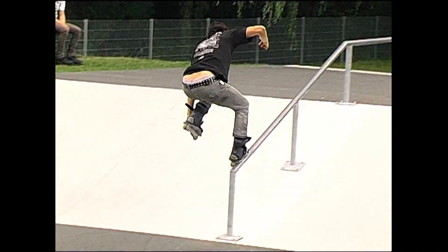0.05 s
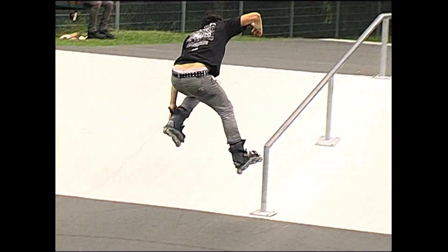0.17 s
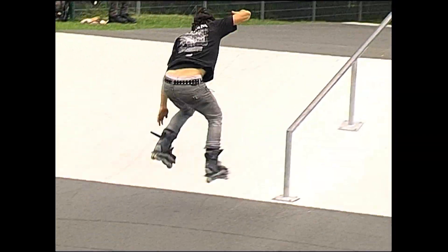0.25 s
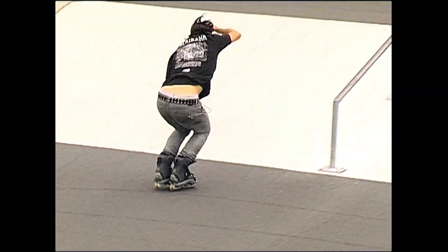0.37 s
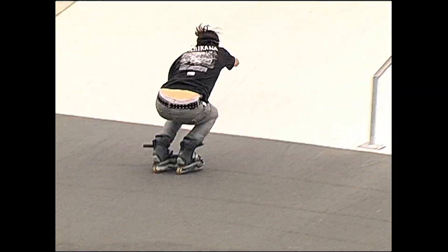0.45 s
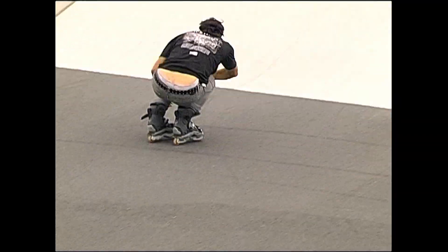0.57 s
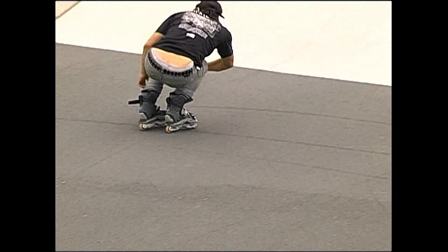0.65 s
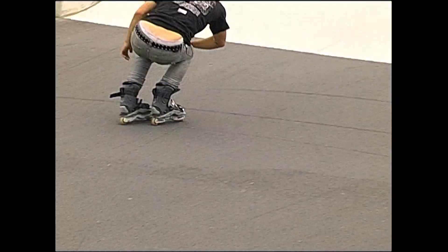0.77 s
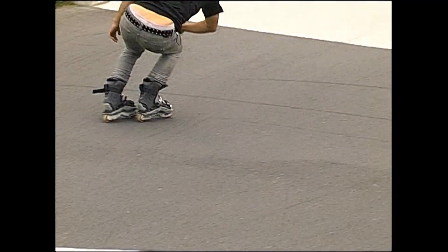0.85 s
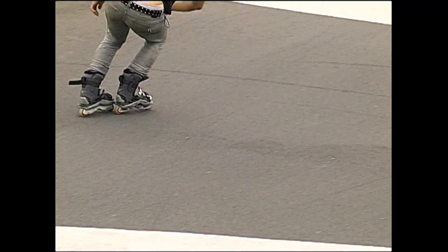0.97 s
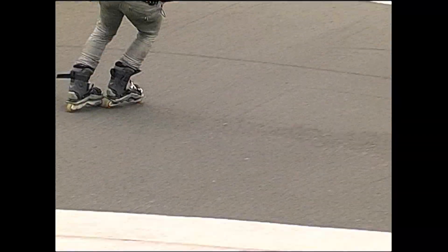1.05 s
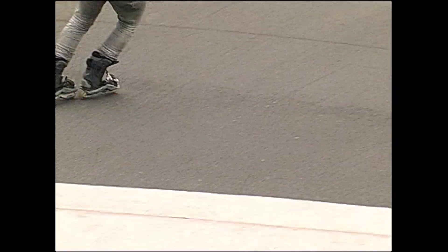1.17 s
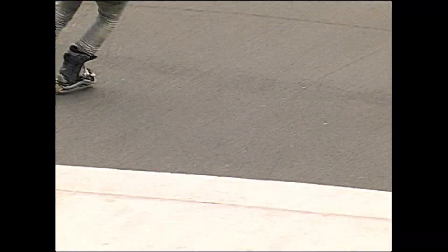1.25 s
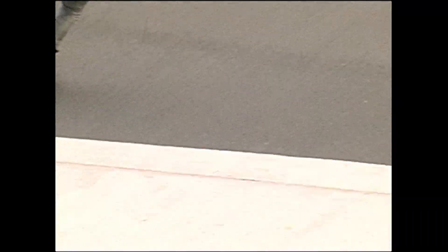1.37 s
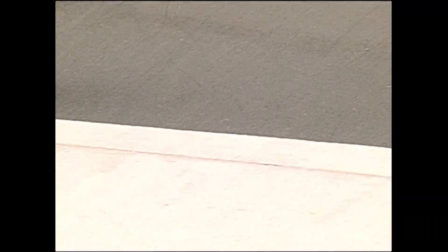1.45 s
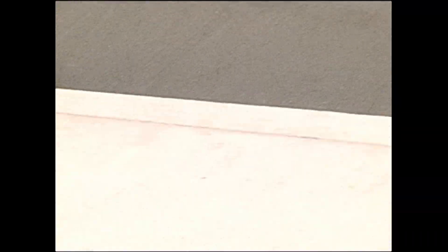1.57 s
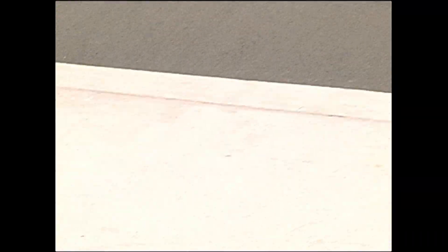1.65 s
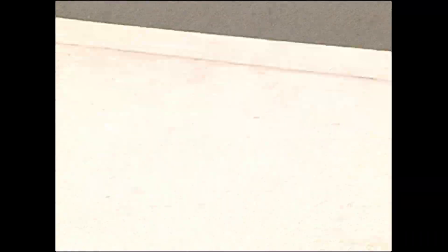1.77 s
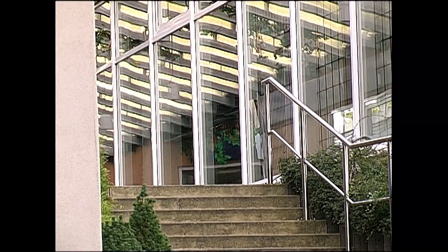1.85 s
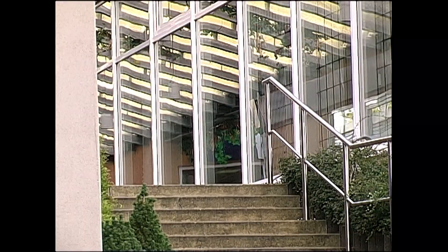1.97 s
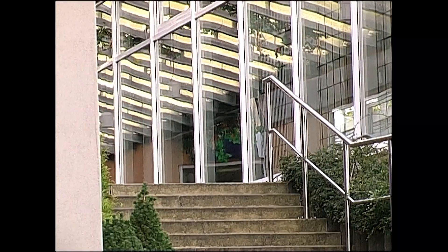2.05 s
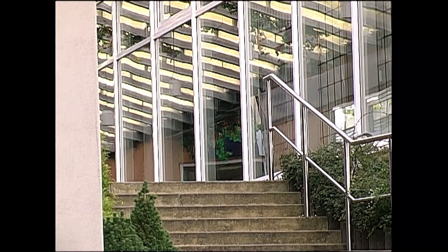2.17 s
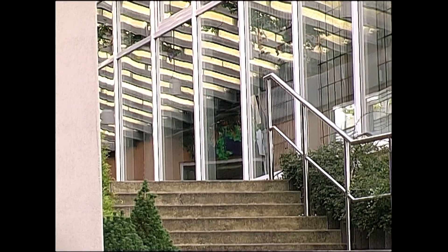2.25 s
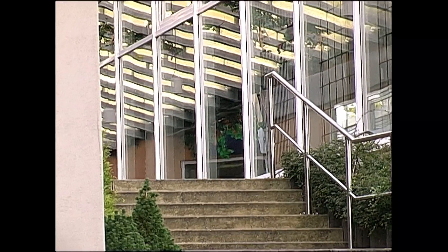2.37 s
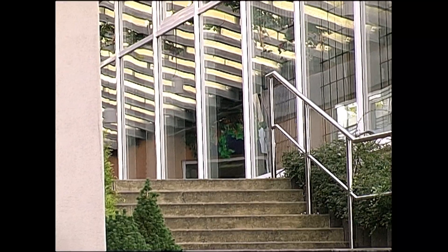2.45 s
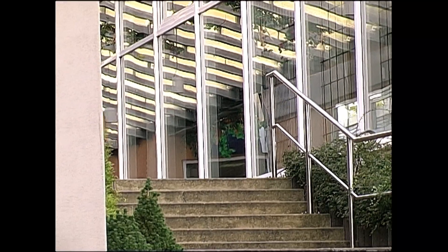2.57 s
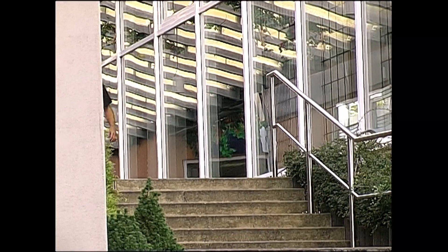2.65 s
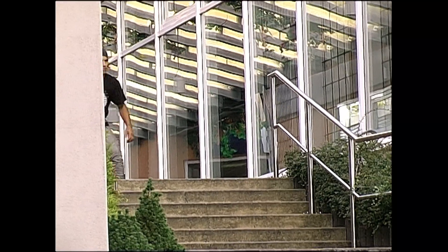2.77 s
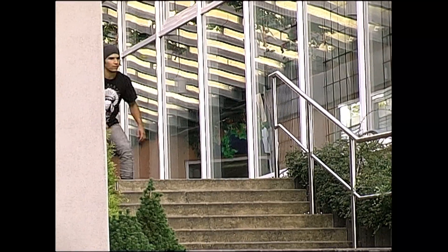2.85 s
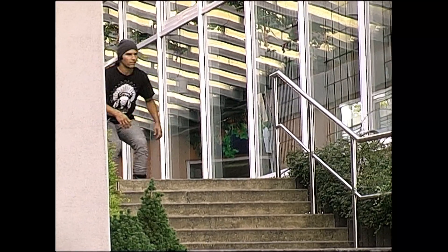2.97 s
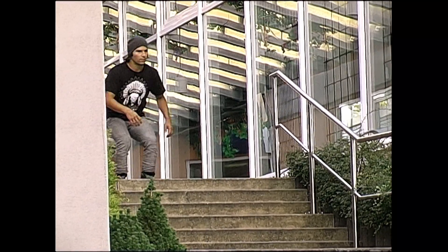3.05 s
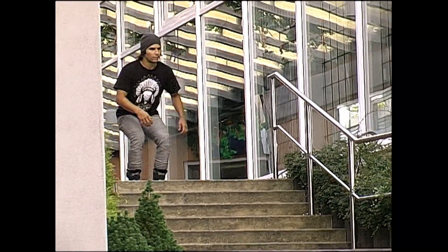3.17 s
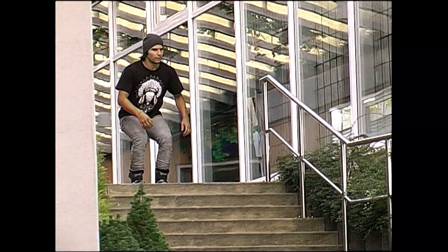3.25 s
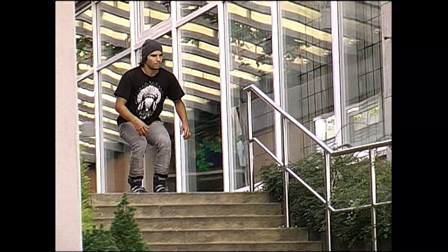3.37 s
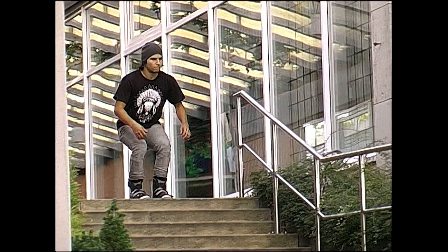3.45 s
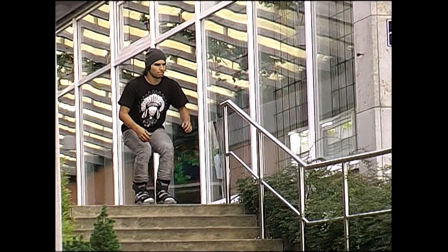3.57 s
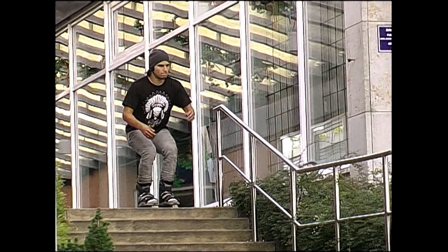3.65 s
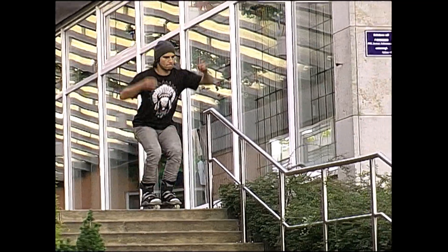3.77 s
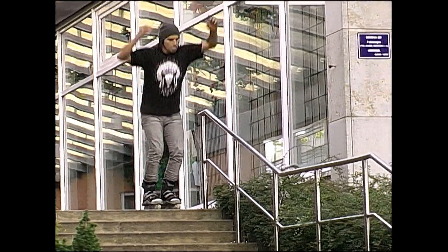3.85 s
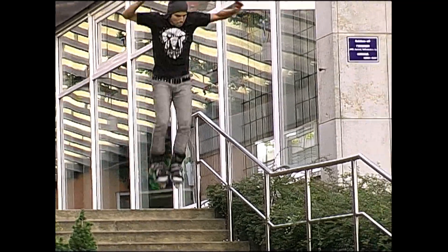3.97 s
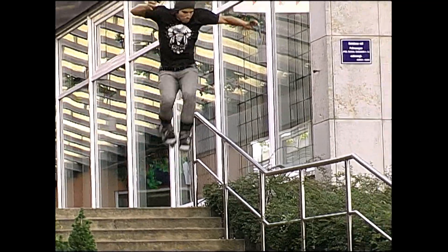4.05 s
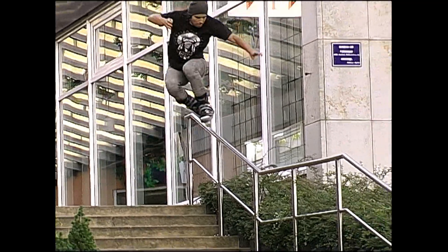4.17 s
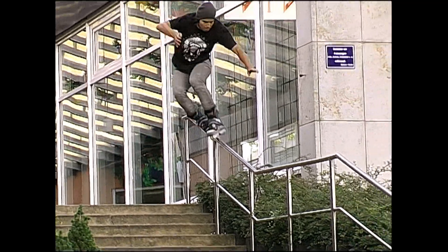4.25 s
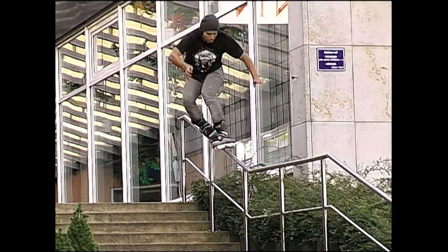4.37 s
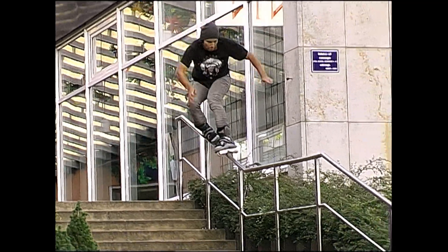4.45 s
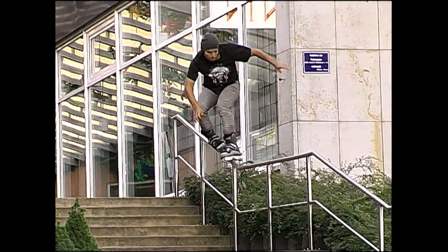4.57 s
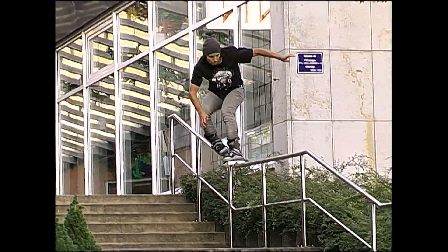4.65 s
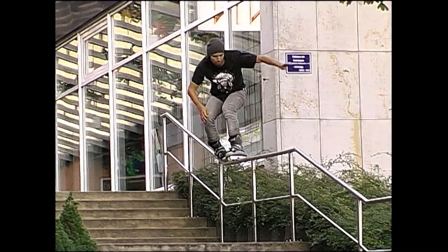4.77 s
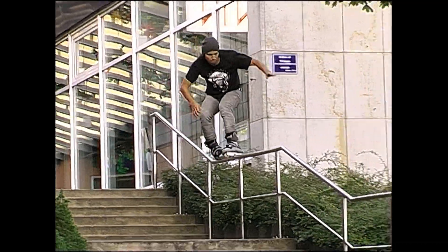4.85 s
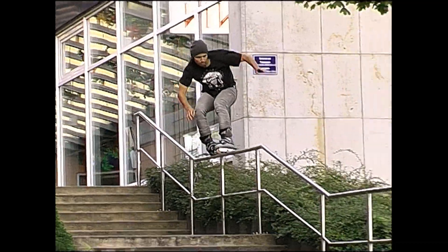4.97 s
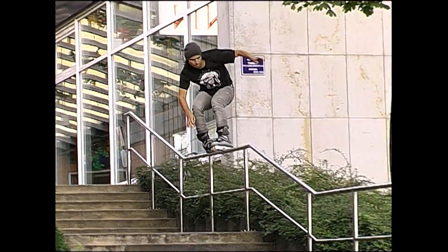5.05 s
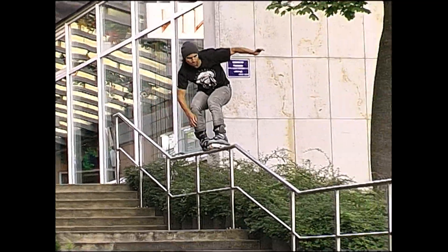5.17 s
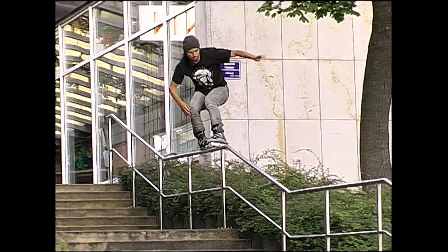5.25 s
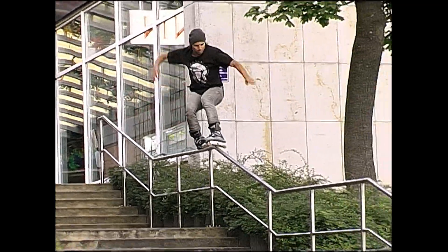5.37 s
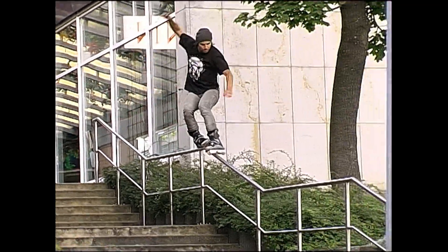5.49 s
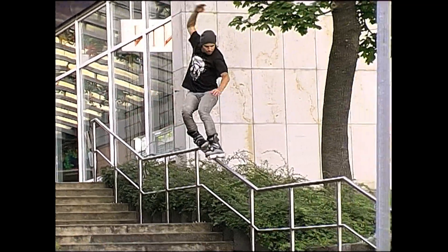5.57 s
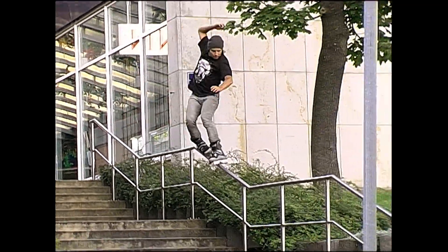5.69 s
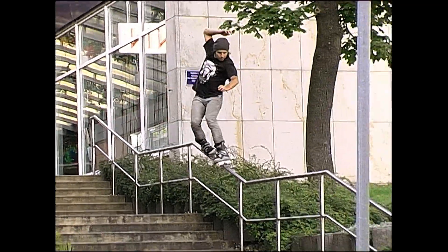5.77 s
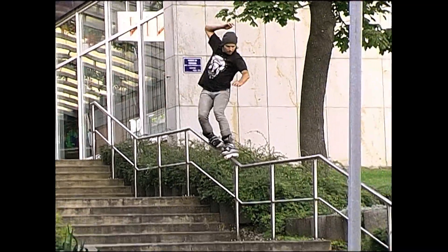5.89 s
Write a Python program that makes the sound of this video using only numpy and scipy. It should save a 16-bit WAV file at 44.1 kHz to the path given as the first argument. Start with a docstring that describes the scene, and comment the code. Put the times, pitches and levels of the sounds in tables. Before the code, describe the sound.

Outdoors with low wind, skates kick off a rail, land with a loud crack and roll closer; abruptly, light clicks and reverberant handrail knocks follow.

```python
"""A low hum of wind and town is heard first, with a sole sliding on steel, outdoors: two inline skate tricks.
A skate kicks off a rail, lands hard and rolls nearer on asphalt with a brief squeal and knocks.
Abruptly a stairway between walls follows: light clicks, then a skater's blows along a kinked handrail.
Contacts are noise bursts through minimum-phase colours, steel is a sum of decaying modes,
friction and rolling are coloured noise, and reflections are noise tails that decay band by band."""
import sys
import numpy as np
from scipy import signal
from scipy.fft import rfft, irfft
from scipy.io import wavfile
from scipy.ndimage import uniform_filter1d

SR = 44100
rng = np.random.default_rng(int(sys.argv[2]) if len(sys.argv) > 2 else 0)


def digitize_waveform(pressure):
    """Quantize a signal to 16-bit integers and store it at the path in sys.argv[1].

    Rows of a 2-D input are taken as channels; values are limited to [-1, 1].
    """
    field = np.atleast_2d(pressure).T
    bounded = np.clip(field, -1, 1)
    quanta = np.round(bounded * 32767).astype(np.int16)
    wavfile.write(sys.argv[1], SR, quanta)


N = 261072
TIME = np.arange(N) / SR  # s
BINS = np.fft.rfftfreq(N, 1 / SR)  # Hz
CHANGE_S = 1.878  # the park gives way to the stairway

# Stereo width of diffuse and of near sound. Each row: frequency in Hz, side over mid in dB.
DIFFUSE_WIDTH = [(60, -30), (110, -22.5), (200, -12), (380, -3.5), (700, 4.5), (1290, -0.5), (2380, -1),
                 (4400, -4), (8120, -1), (15000, 0)]
NEAR_WIDTH = [(60, -24), (110, -21.5), (200, -21), (380, -1.5), (700, 3), (1290, -6.5), (2380, -5.5),
              (4400, -8), (8120, -9), (15000, -26)]
# Unequal colour of the two receivers. Each row: frequency in Hz, left over right in dB.
RECEIVER_BALANCE = [(100, 0), (230, 1.9), (350, 2.5), (480, 7.5), (650, 1), (950, -2), (2100, -3),
                    (4200, -1.6), (8000, -1), (15000, -0.5)]
BAND_LIMIT_HZ = 15800

# Background noise. Each holds: level in the park in dB, level on arriving at the stairway in dB,
# fade there in dB per s. Gusts are added to the wind.
WIND_LEVELS = (-38, -38.5, 1.19)
TOWN_LEVELS = (-45.5, -49, 1)
# Gusts lifting the wind. Each row: centre in seconds, lift in dB.
GUSTS = [(.5, 6), (1.07, 4.5), (1.55, 5), (1.82, 3), (2.04, 2.5)]
GUST_HALF_LENGTH_S = 0.079
# Low hum. Each row: time in seconds, mean level in dB.
HUM_LEVELS = [(2.1, -44.5), (2.35, -39), (3.2, -41), (3.8, -52.5), (4.5, -40), (5.2, -52), (5.42, -37),
              (5.65, -52)]
# Spectra of wind and town. Each row: frequency in Hz, relative level in dB.
WIND_COLOUR = [(8.8, -50), (15, -16.5), (59, 0.5), (75, -5.5), (87, -4), (102, -14), (145, -9.5),
               (172, -17), (220, -18.5), (314, -25.5), (383, -30.5), (427, -36), (600, -42.5), (780, -71),
               (1320, -120)]
TOWN_COLOUR = [(260, -37.5), (450, -8), (562, -14), (1030, -3.5), (1760, -4.5), (3040, -11.5), (3740, -13),
               (4090, -13.5), (6970, -21.5), (9790, -25.5), (10900, -28), (15500, -34)]
# Faint steady high tones. Each row: frequency in Hz, level in dB.
HIGH_TONES = [(1502, -68.5), (3300, -72.5), (3601, -68.5), (10497, -90.5), (10799, -84), (11100, -84),
              (11396, -89.5)]

# Decay of reflections from the park ramps and the stairway walls. Each row: frequency in Hz, t60 in seconds.
RAMP_DECAY = [(200, .15), (1000, 0.31), (3000, 0.35), (5000, 0.49), (8000, 0.51), (10000, 0.29),
              (15000, .22)]
WALL_DECAY = [(200, 1), (1000, 0.91), (3000, 0.83), (5000, 0.62), (7000, 0.45), (9000, 0.37), (15000, 0.32)]

# Straight path of the rolling skater: time and distance of the closest point, and speed.
# The closest point falls after the park has ended, so the rolling only nears.
PASS_S, PASS_M, SPEED_M_PER_S = 2, 4.4, 2.8
ROAR_DB, GROUND_DB = -42.5, -43.5  # mean levels the path would reach at the closest point
# The bearings sizzle all along, and much louder for a while, until the wheels leave the asphalt for concrete.
SIZZLE_DB, SWELL_DB = -67.5, -56.5
SWELL_START_S, SWELL_END_S, SWELL_RISE_S, SWELL_FALL_S = 0.6, 1.56, 0.57, .08
# Spectra of roar, ground rumble, bearings and frame. Each row: frequency in Hz, relative level in dB.
ROLL_COLOUR = [(260, -33), (450, -3), (734, -10), (1000, -2), (1710, -0.5), (1980, -3), (3800, -3.5),
               (5180, -10), (8320, -18), (9650, -23), (11000, -39), (15500, -35)]
GROUND_COLOUR = [(90, -10), (140, 1.5), (200, 8), (270, 0.5), (400, -11.5), (700, -40)]
BEARING_COLOUR = [(7500, -31), (9000, -5), (9700, -1), (10300, -11), (11200, -19), (15000, -21)]
FRAME_COLOUR = [(300, -18), (800, -7), (1400, -6), (2000, 4), (2800, 2), (3500, -24), (7000, -17.5),
                (15000, -35)]
# Stones snapping under the wheels. Each row: start in seconds, relative level in dB.
STONES = [(0.8944, -36.5), (1.1043, -45), (1.1373, -26.5), (1.274, -39)]
# Wheels crossing cracks and rough patches. Each row: start in seconds, relative level in dB, t60 in seconds.
JOINTS = [(1.316, -42, .08), (1.428, -39.5, .08), (1.7455, -31, .02), (1.750, -34, 0.042),
          (1.822, -42, 0.03)]

# A thin squeal whose pitch arches up and down.
SQUEAL_TOP_S, SQUEAL_TOP_HZ, SQUEAL_ARCH_S = 1.386, 1710, .258
SQUEAL_DB, SQUEAL_HALF_LENGTH_S = -39.5, 0.14

# A short hollow clack. Each row: start in seconds, relative level in dB, t60 in seconds.
CLACK = [(1.8608, -34, 0.019), (1.8636, -32, 0.042), (1.8705, -44, .06)]
# Modes of the clacking body. Each row: frequency in Hz, relative level in dB, t60 in seconds.
CLACK_BODY = [(649, -29, 0.08), (1350, -31, 0.033), (2116, -27, 0.05), (2200, -28, 0.065),
              (5000, -39, 0.045), (6100, -39, 0.036)]

# Small clicks of the skates before the jump. Each row: start in seconds, relative level in dB.
TICKS = [(3.527, -42), (3.6068, -44), (3.7475, -37), (3.819, -34.5), (3.827, -37), (3.85, -37), (3.95, -35),
         (3.9615, -39)]
# Spectrum of clicks and stones. Each row: frequency in Hz, relative level in dB.
TICK_COLOUR = [(2000, -30), (3500, 0), (5500, -4), (7000, 1), (8300, -6.5), (9500, 1), (10800, -20),
               (15000, -19.5)]

# The skate leaves the park rail. Each row: start in seconds, level in dB, t60 in seconds.
KICKS = [(.242, -10, 0.019), (0.2421, -20.5, 0.19)]
# Spectra of the kick and the sliding sole. Each row: frequency in Hz, relative level in dB.
KICK_COLOUR = [(290, -47), (500, -24), (1170, -31), (1490, -16), (1720, -5.5), (2540, -18), (4500, 1.5),
               (4980, -3.5), (6090, -5), (7670, -10.5), (8360, -18), (12300, -17), (15500, -41)]
SLIDE_COLOUR = [(350, -50), (600, -41), (1040, 5), (1480, -8), (1600, 10.5), (2040, -38), (2940, 3),
                (3460, -7), (4590, -6), (8410, -9), (15000, -32)]
# Modes of the park rail. Each row: frequency in Hz, relative level in dB, t60 in seconds (at most 1 is used).
PARK_RAIL = [(868, -23, 2.6), (950, -25, 0.31), (1035, -26, 0.92), (1373, -23, 0.7), (3252, -17, 0.25),
             (3570, -17.5, 0.3), (3590, -15.5, 0.27), (4420, -7.5, 0.42), (4860, -19.5, 0.71),
             (5093, -22.5, 1.7), (5170, -5.5, 0.14), (5706, -16, 0.17), (5780, -10, 0.2), (5730, -19, 0.13),
             (6440, -16, 0.32), (6600, -33, 1.6), (7400, -21, 0.074), (8150, -25, 3.9), (8270, -9, 0.23),
             (8985, -19, 0.14), (9900, -15, 0.25), (9975, -12, 0.14), (10640, -16, 0.13),
             (10740, -21, 0.27)]
# The slide is steady, presses harder around the kick and fades after it.
PARK_SLIDE_DB, PUSH_DB, PUSH_S, PARK_RELEASE_S = -45, 6, 0.046, 0.45

# Wheels slapping down one after another. Each row: start in seconds, level in dB, t60 in seconds.
LANDING = [(.438, -9.5, 0.015), (.4415, -15, 0.008), (.4443, 6, 0.005), (.4464, -10.5, 0.029),
           (.4522, -15, .012)]
# Spectrum of wheel slaps and of the clack. Each row: frequency in Hz, relative level in dB.
WHEEL_COLOUR = [(150, -16.5), (450, -12.5), (700, -14.5), (1000, -9.5), (1400, -3.5), (2200, -6.5),
                (3300, -2), (4500, -2), (5700, -8.5), (8100, -7.5), (9600, -5.5), (10600, -12),
                (15500, -25.5)]
# The skater's weight meeting the ground, on landing and over bumps.
# Each row: start in seconds, level in dB, frequency in Hz, t60 in seconds.
THUDS = [(.446, -7.5, 171, 0.054), (.4465, -14.5, 285, 0.04), (.4385, -18, 296, 0.023),
         (1.3, -26, 260, 0.074), (1.747, -21, 178, 0.042)]

# Blows on the handrail. Each row: start in seconds, level in dB, t60 in seconds,
# brightness in dB per octave, relative boom in dB, relative steel ring in dB.
BLOWS = [(4.3874, -18.5, 0.038, 2.5, -35.5, -47), (4.391, -11.5, 0.015, 1, -33.5, -41),
         (4.403, -20, 0.061, -1, -31.5, -49), (4.505, -31.5, 0.089, -3, -44, -53),
         (4.785, -30.5, 0.12, -3, -33.5, -45), (4.899, -30, 0.091, 1, -46, -60),
         (4.951, -31.5, 0.073, -1, -49, -62), (5.573, -31.5, 0.027, -4.5, -42.5, -53),
         (5.695, -31, 0.11, -0.5, -48, -54), (5.719, -30.5, 0.057, 3, -43.5, -54.5)]
# Soles brushing the steel just before they take weight. Each row: time of full contact in seconds,
# level in dB, rise in seconds, brightness in dB per octave.
BRUSHES = [(4.386, -25, 0.026, -2), (4.785, -37.5, 0.031, -5), (4.899, -40.5, .024, 2),
           (5.573, -49, 0.04, -4.5), (5.695, -36.5, 0.019, 1.5)]
# Spectra of blows and scrape. Each row: frequency in Hz, relative level in dB.
BLOW_COLOUR = [(250, -11), (480, -10), (620, -17), (800, -8), (1000, -10), (1500, -2), (2200, -3.5),
               (3100, 1), (4300, 1.5), (4850, -1.5), (5600, -5), (7200, -8), (8500, -5), (11000, -20),
               (15500, -39)]
SCRAPE_COLOUR = [(500, -29), (1400, 1), (2300, -2), (3400, 2.5), (5500, -4.5), (8500, -7), (15000, -26)]
# Modes of the handrail, of its span past the last kink, and of the booming tube and posts.
# Each row: frequency in Hz, relative level in dB, t60 in seconds (at most 1 is used).
HANDRAIL = [(1460, -6, 1), (1940, 0.5, 0.37), (2379, -16, 2.4), (2870, -5, 0.58), (3100, 2, 0.7),
            (3050, 0, 0.58), (3560, -11, 0.56), (3850, -14, .45), (4420, -20, 0.4), (5249, -7, 0.5),
            (6200, -21, 0.36), (6939, -29, 0.53), (8400, -10, 0.23)]
LOWER_SPAN = [(169.6, 18.5, 0.44), (1326, 14, 0.17), (2780, 15, 0.13), (3000, 11, .25), (3060, 10, 0.53),
              (3340, 7, .25), (3430, 11, 0.44), (4000, 2, 0.22), (4520, 0, 0.18), (8200, -6, .3),
              (8400, 1, .25), (8560, 0, .2)]
POSTS = [(117, -0.5, 0.35), (164.9, -2, 0.45), (232, -3, 0.25), (310.2, 2, 0.23), (348.4, -7, 0.18),
         (490, -9, 0.15), (1280, 3, 0.039), (1464, 6.5, 0.077), (1630, 7.5, .06)]
KINK_S = 5.5  # blows from here on ring the lower span
# The slide fades as the skater slows, and the sole bites briefly after every blow (relative to that blow).
STAIR_SLIDE_DB, SLOWING_DB_PER_S, BITE_DB, BITE_T60_S = -54.5, 4, -15.5, .22


def amp(db):
    """Level to amplitude: 20 dB is a factor of ten."""
    return 10 ** (np.asarray(db) / 20)


def unit(x):
    """Normalises the mean power to 1."""
    return x / np.sqrt(np.mean(x ** 2) + 1e-20)


def read(points, hz):
    """Interpolates a spectrum linearly over log frequency."""
    f, value = np.transpose(points)
    return np.interp(np.log(hz + 1), np.log(f + 1), value)


def held(start, end, rise, fall):
    """Linear envelope that rises from start, holds until end and then falls to silence."""
    onset = np.clip((TIME - start) / rise, 0, 1)
    return onset * np.clip(1 - (TIME - end) / fall, 0, 1)


def bell(s, half_length):
    """Gaussian hump of height 1 around time s."""
    return np.exp(-((TIME - s) / half_length) ** 2)


def by_place(park_db, stairs_db, fade_db_per_s):
    """Gain of a background sound: steady in the park, slowly fading at the stairway."""
    fading_db = stairs_db - fade_db_per_s * (TIME - CHANGE_S)
    db = np.where(TIME < CHANGE_S, park_db, fading_db)
    return amp(uniform_filter1d(db, size=800))


def add(mix, s, sound):
    """Superposition: adds a sound in place at time s."""
    part = mix[max(round(s * SR), 0):][:len(sound)]
    part += sound[:len(part)]


def convolve(x, response):
    """Linear filtering of one channel by one or two impulse responses."""
    return signal.fftconvolve(x[None], np.atleast_2d(response), axes=1)[:, :N]


def causal(db_of_hz, size=2048):
    """Minimum-phase response of energy 1: the log gain fixes the phase by a Hilbert transform."""
    hz = abs(np.fft.fftfreq(size, 1 / SR))
    log_gain = np.log(amp(np.maximum(db_of_hz(hz), -90)))
    response = np.fft.ifft(np.exp(np.conj(signal.hilbert(log_gain)))).real
    return response / np.linalg.norm(response)


def spread(mid, side, width):
    """Stereo width from the ratio of an unrelated side signal to the mid."""
    side = irfft(rfft(side) * amp(read(width, BINS)), N)
    return np.array([mid + side, mid - side])


def noise(colour, width, grit_db=0):
    """Coloured stereo noise of rms 1; grit makes some grains much larger than others."""
    grain_db = grit_db * np.minimum(rng.exponential(1, N), 6)
    grains = rng.standard_normal((2, N)) * amp(grain_db)
    mid, side = irfft(rfft(grains) * amp(read(colour, BINS)), N)
    return unit(spread(unit(mid), unit(side), width))


def waver(hz):
    """Low-pass random fluctuation of rms 1, up to about hz changes a second."""
    return unit(irfft(rfft(rng.standard_normal(N)) / (1 + (BINS / hz) ** 4), N))


def burst(db, t60):
    """Contact force: random signs under an exponential decay."""
    t = np.arange(SR // 4) / SR
    return amp(db - 60 * t / t60) * rng.choice([-1., 1.], len(t))


def contacts(rows, colour):
    """Contact forces filtered by the spectral response of the struck thing."""
    force = np.zeros(N)
    for s, db, t60 in rows:
        add(force, s, burst(db, t60))
    return convolve(force, causal(lambda hz: read(colour, hz)))[0]


def ring(modes):
    """Free vibration: a sum of decaying modes, each at a random phase."""
    t = np.arange(SR) / SR
    total = 0
    for hz, db, t60 in modes:
        decay = amp(db - 60 * t / min(t60, 1))
        total = total + decay * np.sin(2 * np.pi * (hz * t + rng.random()))
    return total * (1 - np.exp(-t * SR / 20))  # onset over some 20 samples


def echoes(x, decay, delay, scale=1):
    """Diffuse reflections: noise whose bands each decay at their own rate."""
    hz, t, z = signal.stft(rng.standard_normal((2, N)), SR, nperseg=256)
    t60 = scale * read(decay, hz)[:, None]
    tails = signal.istft(z * amp(-60 * t / t60), SR, nperseg=256)[1][:, :N]
    tails = tails * np.clip(TIME / delay - .5, 0, 1)  # builds up around the delay
    tails = spread(*tails, NEAR_WIDTH)[:, :SR]
    return convolve(x, tails / np.linalg.norm(tails[0]))


def sole(force, tilt_db):
    """Spectral tilt of a plastic sole on steel: the force grows duller or brighter by the octave."""
    def tilted(hz):
        return read(BLOW_COLOUR, hz) + tilt_db * np.log2(np.maximum(hz, 500) / 4000)
    return signal.fftconvolve(force, causal(tilted))


def wall_slap(x, left_s=.0104, right_s=0.0081, gain_db=-6):
    """Specular reflection: the nearest wall, off to the right, repeats the sound a moment later."""
    reflections = np.array([np.roll(x, round(s * SR)) for s in (left_s, right_s)])
    return x + amp(gain_db) * reflections


def background(hum_hz=72, drift_hz=2.27, swell_db=1.0):
    """Broadband noise and tones: gusty wind, a wavering low hum, the wash of town, faint high tones."""
    gusts = amp(sum(db * bell(s, GUST_HALF_LENGTH_S) for s, db in GUSTS))
    wind = by_place(*WIND_LEVELS) * gusts * noise(WIND_COLOUR, DIFFUSE_WIDTH)
    turns = np.cumsum(hum_hz + drift_hz * waver(8.1)) / SR
    hum_db = np.interp(TIME, *np.transpose(HUM_LEVELS)) + swell_db * waver(3.4)
    hum = amp(hum_db) * np.sqrt(2) * np.sin(2 * np.pi * turns)
    town = by_place(*TOWN_LEVELS) * amp(.5 * waver(3.5)) * noise(TOWN_COLOUR, DIFFUSE_WIDTH)
    high_tones = np.zeros(N)
    for hz, db in HIGH_TONES:
        high_tones += amp(db) * np.sqrt(2) * np.sin(2 * np.pi * (hz * TIME + rng.random()))
    return wind + hum + town + high_tones


def run_up(tick_db=-8, t60=0.014, wet_db=-7):
    """Impulsive contact between walls: light clicks of frames and buckles at the top of the stairs."""
    ticks = contacts([(s, db + tick_db, t60) for s, db in TICKS], TICK_COLOUR)
    return wall_slap(ticks) + amp(wet_db) * echoes(ticks, WALL_DECAY, delay=0.011, scale=0.77)


def clack(left_db=-4, right_db=5):
    """Forced chatter followed by free ringing of a hollow body, louder on the right."""
    sound = contacts(CLACK, WHEEL_COLOUR)
    add(sound, CLACK[0][0], ring(CLACK_BODY))
    return sound * amp([[left_db], [right_db]])


def squeal(jitter=0.0026, shimmer_db=1.0):
    """Frequency modulation: one clean, slightly unsteady tone glides up and down again."""
    pitch = SQUEAL_TOP_HZ * bell(SQUEAL_TOP_S, SQUEAL_ARCH_S) * (1 + jitter * waver(80))
    tone = np.sqrt(2) * np.sin(2 * np.pi * np.cumsum(pitch) / SR)
    plateau = np.exp(-((TIME - SQUEAL_TOP_S) / SQUEAL_HALF_LENGTH_S) ** 4)  # loud only near the top
    return tone * plateau * amp(SQUEAL_DB + shimmer_db * waver(40))


def asphalt_patches(roar):
    """Time-varying filtering: the colour shifts with each patch of asphalt."""
    hz, t, z = signal.stft(roar, SR, nperseg=512)
    patches = rng.standard_normal(z.shape[1:])
    for axis in (0, 1):
        patches = uniform_filter1d(patches, size=6, axis=axis)
    return signal.istft(z * amp(2.0 * unit(patches)), SR, nperseg=512)[1][:, :N]


def rolling(flutter_db=1.5, uneven_db=2.5, rattle_db=2.0, stone_db=-8, joint_right_db=7.0):
    """Rolling noise under the inverse-distance law: grit roars, ground rumbles, bearings sizzle."""
    distance_m = np.hypot(PASS_M, SPEED_M_PER_S * (TIME - PASS_S))
    near = held(LANDING[-1][0], CHANGE_S, rise=.01, fall=.01) * PASS_M / distance_m
    bumps = waver(42)
    roar = amp(ROAR_DB + flutter_db * bumps) * near * noise(ROLL_COLOUR, NEAR_WIDTH, grit_db=3.0)
    roar = asphalt_patches(roar)
    ground = amp(GROUND_DB + uneven_db * bumps) * near * noise(GROUND_COLOUR, NEAR_WIDTH)
    sizzle_swell = held(SWELL_START_S, SWELL_END_S, SWELL_RISE_S, SWELL_FALL_S)
    sizzle = (amp(SIZZLE_DB) + amp(SWELL_DB) * sizzle_swell) * near * amp(rattle_db * waver(110))
    sizzle = sizzle * noise(BEARING_COLOUR, NEAR_WIDTH, grit_db=6.5)
    stones = contacts([(s, db + stone_db, .012) for s, db in STONES], TICK_COLOUR)
    joints = contacts(JOINTS, FRAME_COLOUR) * amp([[-joint_right_db], [joint_right_db]])
    return roar + ground + sizzle + stones + joints


def park_rail(ring_db=-21, rub_db=-11, slide_db=-2, wet_db=-12):
    """Friction excites resonance: the sole rubs the rail into a faint ring, then kicks off its end."""
    kick_s = KICKS[0][0]
    kick = contacts(KICKS, KICK_COLOUR)
    steel = np.zeros(N)
    add(steel, kick_s, amp(ring_db) * ring(PARK_RAIL))
    rubbed = unit(irfft(rfft(rng.standard_normal(N)) * rfft(ring(PARK_RAIL), N), N))
    pressure = amp(PARK_SLIDE_DB + PUSH_DB * bell(kick_s, PUSH_S))
    pressure = pressure * held(0, kick_s, rise=.005, fall=PARK_RELEASE_S)
    slide = pressure * (amp(slide_db) * noise(SLIDE_COLOUR, NEAR_WIDTH) + amp(rub_db) * rubbed)
    return kick + steel + slide + amp(wet_db) * echoes(kick, RAMP_DECAY, delay=0.0049)


def landing(wet_db=-19.0, far_db=-31, far_s=.125):
    """Impact and reflection: wheels slap, the body's weight thuds, near and far ramps answer."""
    slap = contacts(LANDING, WHEEL_COLOUR)
    t = np.arange(SR // 4) / SR
    weight, crack = np.zeros((2, N))
    for s, db, hz, t60 in THUDS:
        add(weight, s, amp(db - 60 * t / t60) * np.sin(2 * np.pi * hz * t))
    # what reaches the ramps is one clean crack at the hardest slap, with the energy of them all
    hardest_s = max(LANDING, key=lambda row: row[1])[0]
    add(crack, hardest_s, np.linalg.norm(slap) * causal(lambda hz: read(WHEEL_COLOUR, hz)))
    answer = echoes(crack, RAMP_DECAY, delay=0.0021)
    far_answer = np.roll(answer, round(far_s * SR), axis=1)
    return slap + weight + amp(wet_db) * answer + amp(far_db) * far_answer


def handrail(ring_db=-4, boom_db=-3, wet_db=-2, chatter_db=2.0):
    """Impact, friction and modal ringing: plastic soles hit and scrape a steel tube between walls."""
    knocks, steel, boom, bite = np.zeros((4, N))
    for s, db, t60, tilt_db, low_db, steel_db in BLOWS:
        span = HANDRAIL if s < KINK_S else LOWER_SPAN
        add(knocks, s, sole(burst(db, t60), tilt_db))
        add(steel, s, amp(steel_db + ring_db) * ring(span))
        add(boom, s, amp(low_db + boom_db) * ring(POSTS))
        add(bite, s, amp(db + BITE_DB - 60 * TIME / BITE_T60_S))
    for s, db, rise, tilt_db in BRUSHES:
        load = np.linspace(0, 1, round(rise * SR))
        swell = amp(db) * load ** 1.18 * rng.choice([-1., 1.], len(load))  # friction grows with the load
        add(knocks, s - len(swell) / SR, sole(swell, tilt_db))
    chatter = amp(chatter_db * waver(230))  # the sole sticks and slips
    on_rail_s = TIME - BLOWS[0][0]
    slide = (on_rail_s > 0) * amp(STAIR_SLIDE_DB - SLOWING_DB_PER_S * on_rail_s)
    scrape = (slide + bite) * noise(SCRAPE_COLOUR, NEAR_WIDTH, grit_db=2)
    reflected = amp(wet_db) * echoes(knocks, WALL_DECAY, delay=0.0075)
    return wall_slap(chatter * knocks) + chatter * scrape + steel + reflected + boom


def scene():
    """Superposition of sources: the skate park ends abruptly and the stairway takes over."""
    in_park = uniform_filter1d((TIME < CHANGE_S) * 1., size=60)
    park = clack() + squeal() + rolling() + park_rail() + landing()
    return background() + park * in_park + run_up() + handrail()


def record(dry, lag_samples=0.31):
    """Two-receiver pickup: unequal colour, a slight lag on the left, clipping, then a band limit."""
    left_gain = amp(read(RECEIVER_BALANCE, BINS) / 2)
    left_lag = np.exp(-2j * np.pi * BINS * lag_samples / SR)
    receivers = np.array([left_gain * left_lag, 1 / left_gain])
    receivers = receivers / np.sqrt(np.mean(abs(receivers) ** 2, axis=0))  # keeps the mean power
    clipped = np.clip(irfft(rfft(dry) * receivers, N), -1, 1)
    low_pass = signal.firwin(511, BAND_LIMIT_HZ, window=("kaiser", 9), fs=SR)
    return signal.oaconvolve(clipped, low_pass[None], "same")


dry = scene()
out = record(dry)
digitize_waveform(out)
```